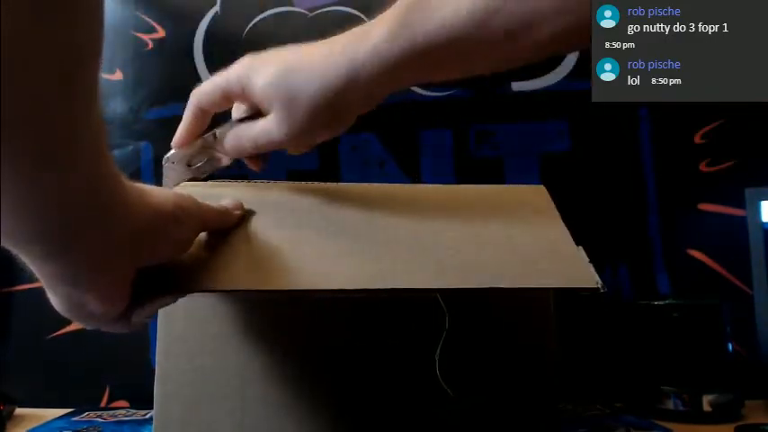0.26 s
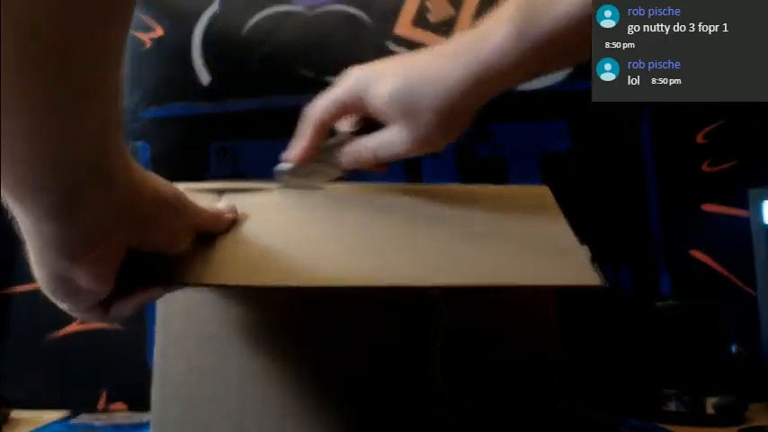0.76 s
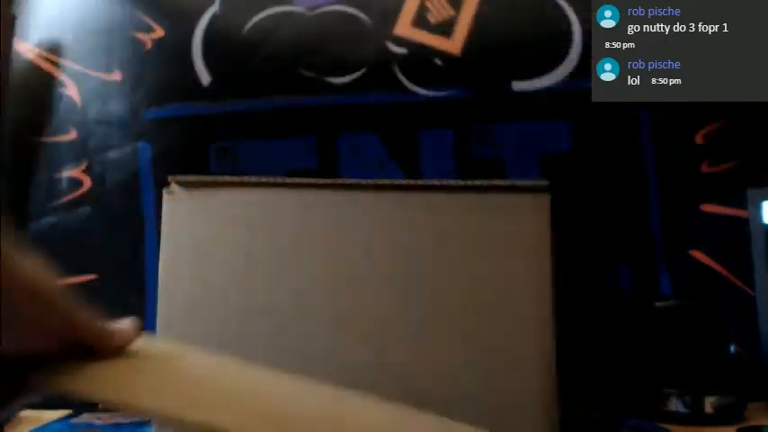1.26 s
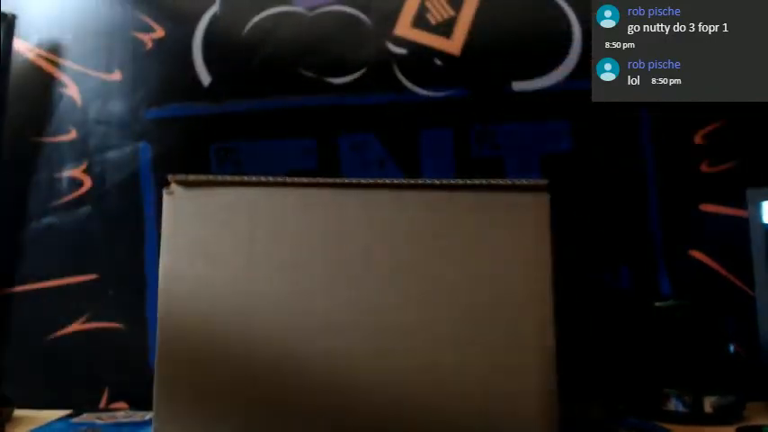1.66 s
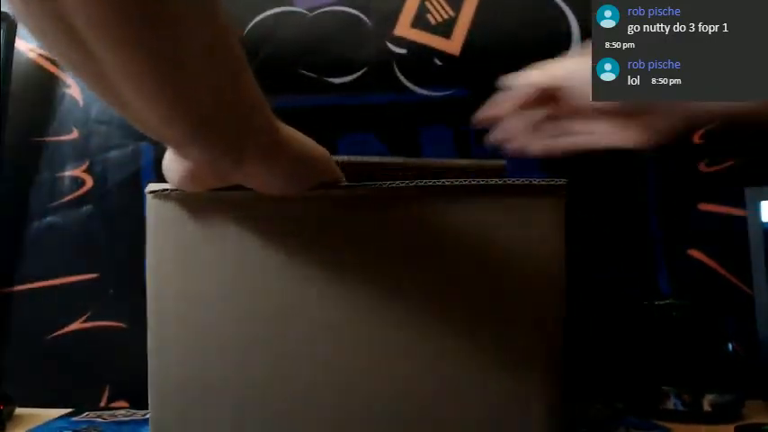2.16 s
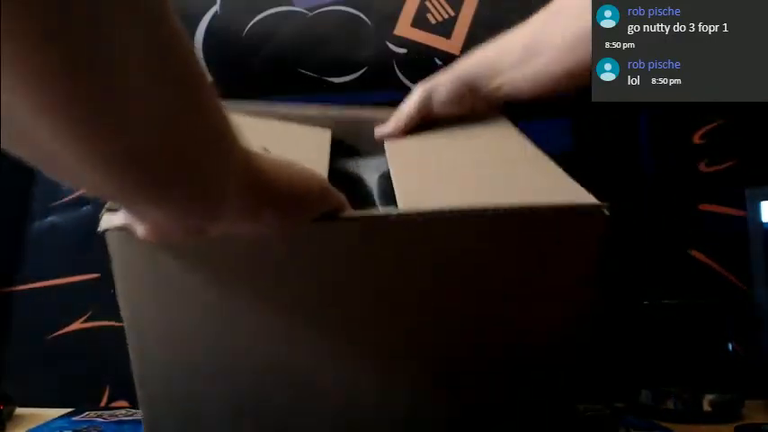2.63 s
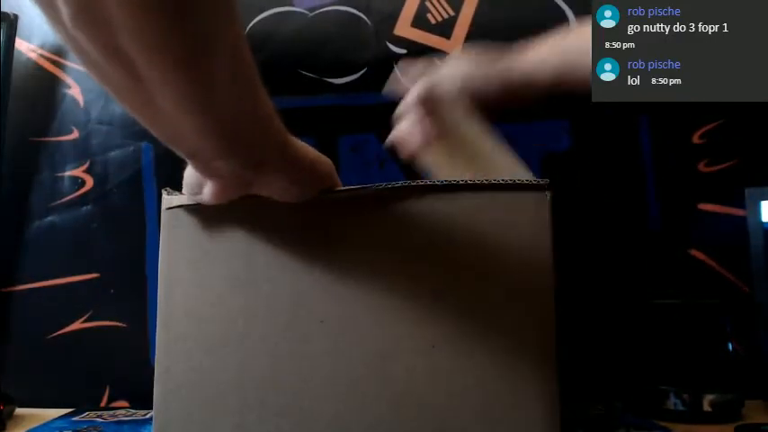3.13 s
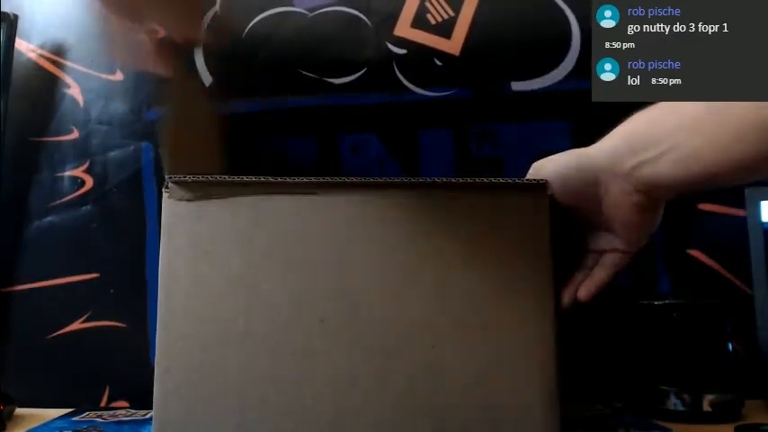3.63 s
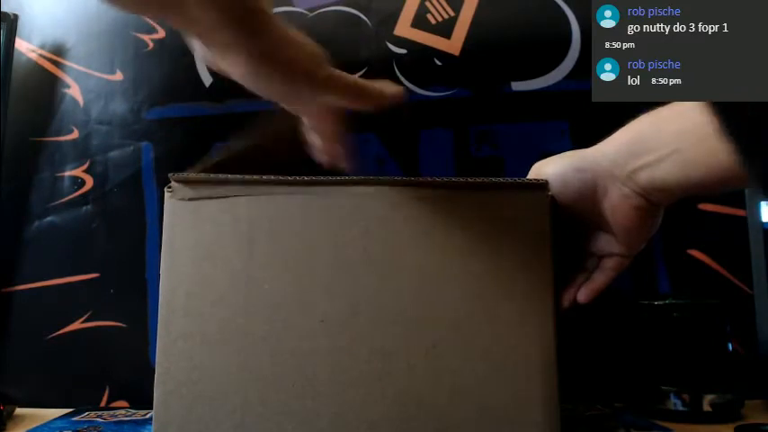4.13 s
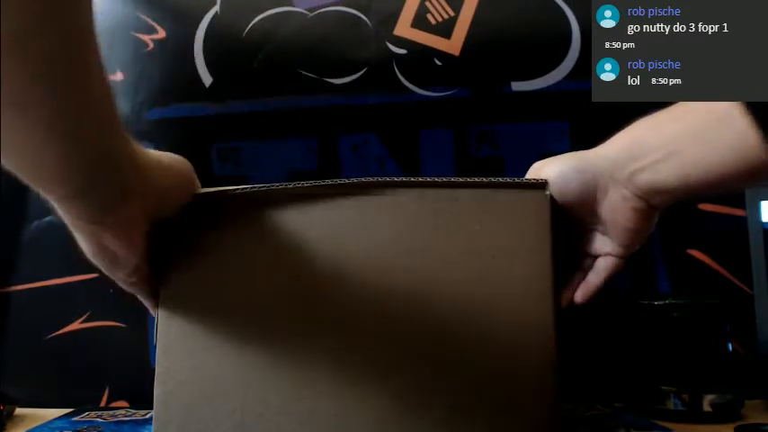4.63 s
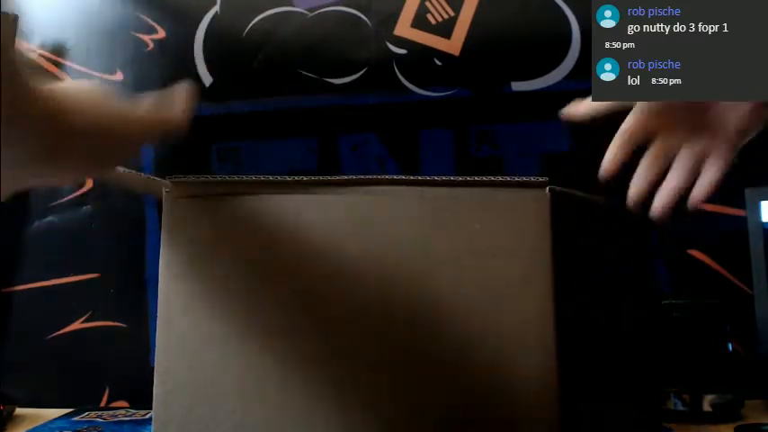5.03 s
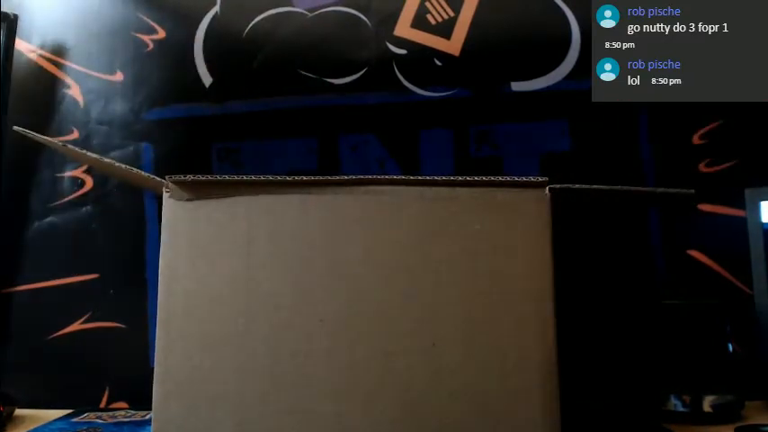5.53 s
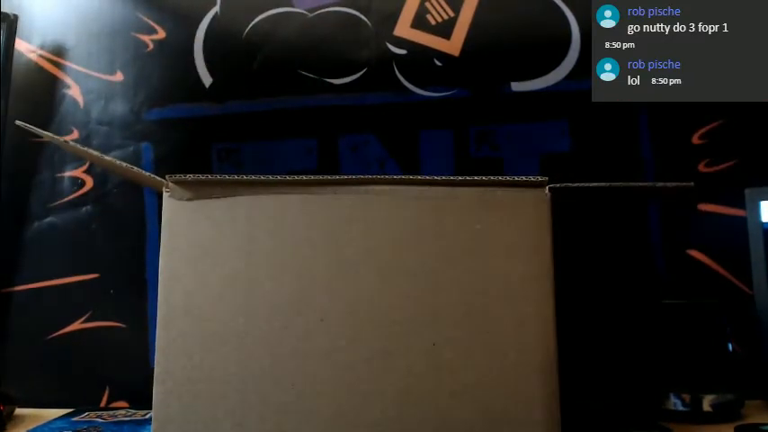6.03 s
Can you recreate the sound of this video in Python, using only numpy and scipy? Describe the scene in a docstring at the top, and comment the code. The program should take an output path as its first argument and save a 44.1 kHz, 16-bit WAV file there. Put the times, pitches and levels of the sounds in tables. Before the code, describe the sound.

Close-up cardboard box opening: ripping blade chatter, a dropped knife's clack, scuffing hands, a loud flap slap and sharp hollow pops, then near quiet.

```python
"""Knife and corrugated box

Close on the desk in a small furnished room with a quiet hum: hands rub and knock a corrugated box.
A knife slides along its edge, chattering over the flutes, and is dropped on the desk; hands then slide
on the board, slap it and flick the flaps open, and a loose piece is dragged further from the microphone.
Rubbing is tearing-fibre noise in five registers; blows, knife and slap are clicks into ringing modes and
noise bursts; chatter, squeak and whistles are wavering sines."""
import sys
import numpy as np
from scipy import signal
from scipy.fft import rfft, irfft
from scipy.io import wavfile

SR = 44100
rng = np.random.default_rng(int(sys.argv[2]) if len(sys.argv) > 2 else 0)


def gain_from_db(level_db):
    """Convert decibel levels to linear amplitude factors (20 dB per decade)."""
    decades = np.asarray(level_db, float) / 20
    return 10 ** decades


def unload_wav(signal):
    """Save mono or channel-first audio to the path in sys.argv[1] as 16-bit WAV at rate SR, clipped to [-1, 1]."""
    wavfile.write(
        sys.argv[1],
        SR,
        np.round(np.clip(np.atleast_2d(signal).T, -1, 1) * 32767).astype(np.int16),
    )


N = 276948


def rms_one(x):
    """Scale to an rms of 1."""
    return x / np.sqrt(np.mean(x ** 2) + 1e-20)


def in_time(rows):
    """Columns after the first (time in seconds) as sample-rate curves."""
    s, *columns = np.transpose(rows)
    return [np.interp(np.arange(N) / SR, s, c) for c in columns]


def during(rows, fade_s):
    """1 while a table lasts, fading just outside both ends."""
    t = np.arange(N) / SR
    return np.clip(np.minimum(t - rows[0][0], rows[-1][0] - t) / fade_s + 1, 0, 1)


def band(x, low_hz, high_hz):
    """Second-order band-pass."""
    top_hz = min(high_hz, .45 * SR)
    return signal.sosfilt(signal.butter(2, [low_hz, top_hz], "band", fs=SR, output="sos"), x + 1e-18)


def coloured(x, spectrum):
    """Shape a steady sound by gains in dB at given Hz, joined along log frequency."""
    hz, db = np.transpose(spectrum)
    grid = np.maximum(np.arange(N // 2 + 1) * SR / N, 1)
    return irfft(rfft(x) * gain_from_db(np.interp(np.log(grid), np.log(hz), db)), N)


def drift(rate_hz):
    """Slow random curve of spread 1: noise through a double low-pass."""
    r = np.exp(-2 * np.pi * rate_hz / SR)
    noise = rng.standard_normal(N + SR)
    return rms_one(signal.lfilter([1], [1, -2 * r, r * r], noise)[SR:])


def strikes(times, levels_db):
    """Single-sample clicks."""
    clicks = np.zeros(N)
    clicks[(np.asarray(times) * SR).astype(int)] = gain_from_db(levels_db)
    return clicks


def ring(clicks, hz, t60):
    """A unit click sets a sine of height 1 ringing; t60 in seconds."""
    r, w = gain_from_db(-60 / (t60 * SR)), 2 * np.pi * hz / SR
    return signal.lfilter([0, np.sin(w)], [1, -2 * r * np.cos(w), r * r], clicks + 1e-18)


def puff(clicks, low_hz, high_hz, t60):
    """Noise that swells within a millisecond or two of each click and dies."""
    swell = np.exp(-1 / (.0007 * SR))
    poles = np.convolve([1, -swell], [1, -gain_from_db(-60 / (t60 * SR))])
    dying = signal.lfilter([1 - swell], poles, clicks + 1e-18)
    noise = rms_one(band(rng.standard_normal(N), low_hz, high_hz))
    return band(dying * noise, low_hz, high_hz)


# Room air. Each row: frequency in Hz, relative level in dB.
AIR = [(25, 9), (60, -12.5), (150, -9), (400, -25), (600, -24), (2500, -32.5), (6000, -42.5), (16000, -55)]
# Hum partials. Each row: frequency in Hz, peak level in dB before a slow waver.
HUM = [(118.4, -62.5), (242.2, -71), (360.7, -70)]


def background():
    """Steady air is shaped noise; the hum is sines that waver in level and phase."""
    air = gain_from_db(-51) * rms_one(coloured(rng.standard_normal(N), AIR))
    t = np.arange(N) / SR
    hum = sum(gain_from_db(db + 2.0 * drift(5.3)) * np.sin(2 * np.pi * hz * t + 0.29 * drift(6.6))
              for hz, db in HUM)
    return air + hum


# Hands and flaps rubbing the board. Each row: start in seconds, length in seconds, panel shake in dB,
# rasp in dB, hiss in dB, fine fibre in dB.
RUBS = [(0, 0.12, -77, -72, -72.5, -100), (0.126, 0.0109, -52.5, -50, -47, -46),
        (0.184, 0.16, -65, -70, -67.5, -77.5), (0.285, 0.086, -55, -58, -59, -65),
        (0.362, 0.031, -40, -44, -42, -62), (1.124, 0.15, -63, -54, -61.5, -88),
        (1.286, 0.023, -72, -56, -47.5, -50.5), (1.32, 0.092, -67.5, -54, -45.5, -52),
        (1.428, 0.11, -88, -63.5, -57, -58), (1.547, 0.035, -62, -54.5, -42.5, -54.5),
        (1.628, 0.021, -52, -48, -49, -52), (1.656, 0.05, -38.5, -40, -55, -57),
        (1.739, 0.13, -40.5, -39.5, -44.5, -53.5), (1.867, 0.078, -50.5, -51.5, -56, -55),
        (1.953, 0.03, -54, -67, -70.5, -60), (2.093, 0.13, -40.5, -47, -49, -47.5),
        (2.213, 0.04, -50, -40.5, -42.5, -46), (2.26, 0.04, -54, -52, -74, -83),
        (2.327, 0.074, -55, -55, -53.5, -50.5), (2.408, 0.024, -47, -48, -43.5, -42),
        (2.481, 0.23, -46.5, -48.5, -49, -52.5), (2.577, 0.043, -55, -42, -44, -39.5),
        (2.619, 0.14, -44, -39.5, -40.5, -43.5), (2.753, 0.086, -49.5, -46, -43.5, -47.5),
        (2.845, 0.018, -50, -51.5, -49, -58.5), (2.89, 0.037, -38.5, -43.5, -50.5, -50),
        (2.969, 0.033, -51, -54, -60, -54.5), (3.019, 0.061, -57, -51, -55, -39),
        (3.072, 0.082, -48, -45, -49.5, -50.5), (3.186, 0.063, -55, -57, -55.5, -59),
        (3.242, 0.12, -49, -50.5, -49, -47.5), (3.352, 0.021, -42.5, -42.5, -37.5, -42),
        (3.405, 0.064, -43.5, -39, -46, -49.5), (3.466, 0.043, -49.5, -45, -50, -51.5),
        (3.549, 0.078, -63.5, -68, -71.5, -74), (3.686, 0.24, -86, -95.5, -94, -88.5),
        (3.952, 0.026, -46.5, -60, -63.5, -57.5), (3.978, 0.043, -26.5, -41, -62.5, -35.5),
        (4.066, 0.028, -53, -53, -56.5, -57), (4.124, 0.16, -68, -61.5, -66, -66),
        (4.171, .09, -51.5, -55, -55, -52.5), (4.266, 0.038, -52.5, -51, -47.5, -48.5),
        (4.301, 0.025, -29, -36, -39, -41), (4.357, 0.041, -45, -47, -46, -59.5),
        (4.398, 0.096, -57, -60.5, -58, -77.5), (4.541, 0.12, -58, -66.5, -65, -70.5),
        (4.615, 0.1, -54.5, -55.5, -52.5, -58), (4.715, 0.035, -59, -49, -65, -50),
        (4.852, 0.027, -71, -71, -56.5, -67), (4.916, 0.032, -63, -62, -54.5, -58),
        (4.978, 0.14, -64.5, -63, -67.5, -74), (5.132, 0.284, -68, -68, -74, -78.5),
        (5.359, 0.034, -64, -64.5, -56.5, -76.5), (5.422, 0.059, -71.5, -62, -54, -60.5),
        (5.507, 0.068, -60.5, -67, -64.5, -75), (5.57, 0.83, -62, -70, -67.5, -74)]
RUB_ATTACK_S = 0.01  # the cut shares it


def rub_power():
    """Power of the five registers for every rub: attack, sagging hold, then a fade as the hand lifts."""
    t, power = np.arange(N) / SR, np.zeros((5, N))
    hold_share, sag_db_per_s, lift_db_per_s = 0.86, 15, 300
    for start, length, shake, rasp, hiss, fibre in RUBS:
        first = int(start * SR)
        age = t[:min(int((length + .3) * SR), N - first)]
        after = np.maximum(age - hold_share * length, 0)
        shape = np.minimum(age / RUB_ATTACK_S, 1) * gain_from_db(-sag_db_per_s * age) * gain_from_db(-lift_db_per_s * after)
        levels_db = np.array([shake, shake, rasp, hiss, fibre])  # the desk shakes with the panel
        power[:, first:first + len(age)] += (gain_from_db(levels_db)[:, None] * shape) ** 2
    return power


# The blade pulled along the edge. Each row: time in seconds, rasp in dB, panel shake in dB.
CUT = [(.385, -36.5, -42.5), (.5, -37.5, -47), (.6, -34, -40.5), (.7, -33, -35.5), (.8, -31.5, -30),
       (.87, -32.5, -32), (.935, -31, -31), (1.0, -32.5, -27.5), (1.03, -27.5, -39.5), (1.06, -28.5, -35.5)]


def cut_power():
    """Power of the five registers as the blade is pulled; desk, hiss and fibre follow the rasp."""
    t = np.arange(N) / SR
    rasp_db, shake_db = in_time(CUT)
    attack = np.clip((t - CUT[0][0]) / RUB_ATTACK_S + 1, 0, 1)
    release = gain_from_db(-277.5 * np.maximum(t - CUT[-1][0], 0))  # dB per s
    levels_db = np.array([rasp_db - 5, shake_db, rasp_db, rasp_db - 1, rasp_db - 3])
    return (attack * release * gain_from_db(levels_db)) ** 2


def fibres(clumps):
    """Fibres tear by the thousand, faster in clumps; now and then a thick one cracks."""
    torn = rng.random(N) < 9000 * clumps / SR
    sizes = gain_from_db(2.4 * np.minimum(rng.exponential(1, N), 5)) * rng.choice([-1, 1], N)
    thick = (rng.random(N) < 150 * clumps / SR) * rng.normal(0, 3.3, N)
    return rms_one(torn * sizes) + 0.54 * rng.standard_normal(N) + thick


# Colour of board under friction. Each row: frequency in Hz, relative level in dB.
FRICTION = [(30, -9.5), (130, -2.5), (400, -2.5), (850, -8.5), (1380, -4.5), (1750, -7), (2900, -9),
            (4500, -9), (8000, -13.5), (10200, -13), (13000, -16), (15800, -11), (16800, -31)]
# The ways the box sounds: desk, panel, rasp, hiss, fine fibre. Each row: low edge in Hz, high edge in Hz,
# t60 of a blow in seconds, t60 of its echo in the room in seconds, echo in dB relative to the blow.
REGISTERS = [(30.7, 167, 0.25, 0.11, -5), (160, 618, 0.13, 0.05, -12), (677, 2790, 0.016, 0.18, -18.5),
             (2630, 9060, 0.012, 0.18, -23.5), (6800, 15000, 0.011, 0.072, -36)]
# Modes of the box. Each row: frequency in Hz, relative level in dB, free t60 in seconds.
BOX = [(265, 0, .09), (360, -7, .15), (433, -15, .15), (553, -7, .17), (855, -8, .15), (1007, -25, .15),
       (1330, -20, .14), (1733, -22, .083), (1997, -23, .11), (2697, -30, .15)]
# Treble patches that come and go under rubbing. Each row: centre in Hz, width in Hz, mean level in dB.
GRAIN = [(3082, 1300, -21), (6630, 1400, -14.5), (7760, 1600, -9), (9140, 1300, -15), (12440, 3700, -13)]


def sliding():
    """Each register has its own fibres; cracks, clumps and pressure are shared; panels resonate along."""
    clumps, pressure_db = gain_from_db(2.3 * drift(130)), 0.8 * drift(30)
    # thick fibres crack through every register at once
    cracking = rng.random(N) < 150 * clumps * gain_from_db(6.0 * drift(12)) / SR
    cracks = cracking * rng.normal(0, gain_from_db(12), N)
    sources = [rms_one(band(coloured(fibres(clumps) + cracks, FRICTION), low, high))
               for low, high, *_ in REGISTERS]

    rasp = sources[1] + sources[2]
    for hz, db, t60 in BOX:  # now one panel mode, now another
        mode = gain_from_db(.6 * db + 6 * drift(19.0)) * rms_one(ring(rasp, hz, .5 * t60))
        if hz < 800:
            sources[1] += 0.18 * mode
        else:
            sources[2] += .3 * mode

    for hz, width, db in GRAIN:
        k = 3 if hz < 7000 else 4
        patch = rms_one(band(sources[k], hz - width / 2, hz + width / 2))
        sources[k] = sources[k] + gain_from_db(db + 3.2 * drift(14.0)) * patch

    out = 0
    for power, source in zip(rub_power() + cut_power(), sources):
        waver = gain_from_db(pressure_db + 0.89 * drift(28))
        out = out + np.sqrt(power) * waver * rms_one(source)
    return out


# Faint thin whistles that glide. Each row: start in seconds, length in seconds, first pitch in Hz,
# last pitch in Hz, mean level in dB rms.
WHISTLE = [(.03, .1, 5300, 6250, -76), (.2, .09, 5400, 5920, -77), (1.195, .07, 2400, 2500, -66),
           (1.328, .025, 6400, 6500, -54), (1.358, .012, 6400, 5900, -54), (1.33, .045, 3200, 3080, -59)]


def whistle():
    """Near sines that glide and waver a little in pitch and level."""
    out = 0
    for start, length, first_hz, last_hz, db in WHISTLE:
        rows = [(start, first_hz), (start + length, last_hz)]
        hz = in_time(rows)[0] * (1 + .008 * drift(150))
        level = np.sqrt(2) * gain_from_db(db + 3.0 * drift(30)) * during(rows, .01)
        out = out + level * np.sin(2 * np.pi * np.cumsum(hz) / SR)
    return out


def burst(s, levels_db):
    """Per register a short burst of noise, then its uneven echo from the room."""
    out, uneven = 0, gain_from_db(2.0 * drift(60))
    for db, (low, high, t60, echo_t60, echo_db) in zip(levels_db, REGISTERS):
        out = out + puff(strikes(s, db), low, high, t60)
        out = out + uneven * puff(strikes(s + 0.0053, db + echo_db), low, high, echo_t60)
    return out


def struck(s, levels_db, pitches_hz, t60):
    """Each blow leaves a dying sine at its own pitch."""
    out, t = np.zeros(N), np.arange(SR // 5) / SR
    for start, db, hz in zip((s * SR).astype(int), levels_db, pitches_hz):
        tone = gain_from_db(db - 60 * t / t60) * np.sin(2 * np.pi * hz * t)
        out[start:start + len(t)] += tone[:N - start]
    return out


# Blows and snaps on the box. Each row: time in seconds, then relative levels of snap in dB, panel in dB
# and crack in dB, struck panel pitch in Hz, snap pitch in Hz.
BLOWS = [(.133, -40, -57, -32.5, 233, 1770), (0.295, -36.5, -44.5, -49.5, 400, 1960),
         (.334, -43, -52, -49.5, 387, 970), (0.376, -16.5, -36, -29.5, 203, 1060),
         (.38, -14, -31.5, -30.5, 408, 1650), (0.4, -42, -49, -32, 337, 1120),
         (0.778, -12, -24.5, -20, 692, 874), (0.941, -23, -25.5, -34, 316, 1360),
         (1.0173, -4.5, -14.5, -22, 435, 1250), (1.04, -16.5, -35.5, -24.5, 640, 1300),
         (1.107, -27.5, -36.5, -48.5, 635, 830), (1.295, -44, -54, -37.5, 200, 1370),
         (1.371, -37, -65, -35.5, 298, 3850), (1.391, -41, -72, -38, 300, 3000),
         (1.43, -45, -58, -61.5, 700, 1300), (1.563, -29, -46.5, -50.5, 212, 1790),
         (1.57, -31, -77, -51, 204, 2460), (1.58, -25, -78, -46.5, 204, 2980),
         (1.59, -41, -72, -47, 204, 2960), (1.876, -28, -32.5, -42.5, 350, 1250),
         (2.095, -31, -42.5, -48.5, 470, 1390), (2.136, -56, -28, -40, 240, 893),
         (2.161, -28, -33, -32.5, 312, 1060), (2.194, -23, -30.5, -44, 286, 1050),
         (2.209, -45, -35, -49.5, 257, 1000), (2.231, -33, -56, -44.5, 300, 1800),
         (2.247, -32, -57, -46.5, 300, 2600), (2.308, -39.5, -60, -50, 300, 1470),
         (2.323, -41, -40, -58, 287, 1020), (2.417, -36, -67.5, -33.5, 396, 2430),
         (2.436, -16.5, -30, -26.5, 396, 1710), (2.467, -8, -13, -23, 392, 1005),
         (2.49, -39.5, -31, -54.5, 425, 900), (2.512, -45, -33.5, -54.5, 420, 900),
         (2.588, -31, -34, -36, 230, 870), (2.604, -29, -40, -45.5, 260, 1480),
         (2.635, -13.5, -34.5, -21.5, 301, 1570), (2.709, -37, -53, -39.5, 398, 1800),
         (2.721, -25, -39, -43, 247, 1000), (2.79, -46, -43, -31.5, 240, 3060),
         (2.803, -36, -48, -35.5, 300, 2460), (2.856, -37, -44, -56.5, 300, 1390),
         (2.898, -19.5, -38, -26, 380, 1590), (3.083, -27.5, -34, -45.5, 200, 1050),
         (3.098, -35, -64, -56.5, 300, 1300), (3.13, -32, -47.5, -55, 305, 2020),
         (3.27, -38, -29.5, -36, 195, 1210), (3.328, -25.5, -34.5, -49, 335, 2620),
         (3.282, -43, -39.5, -56.5, 587, 900), (3.339, -45, -39, -50, 358, 1200),
         (3.376, -21, -17.5, -14.5, 283, 2980), (3.379, -1.5, -21, -10.5, 286, 1356),
         (3.382, -11, -34.5, -37.5, 507, 2000), (3.432, -40, -33, -56.5, 280, 1500),
         (3.505, -42, -39.5, -62.5, 426, 866), (3.527, -34, -39, -38, 230, 1480),
         (3.952, -36.5, -47.5, -50.5, 305, 1247), (3.975, -44, -46.5, -47.5, 379, 1250),
         (3.985, -11, -19.5, -44, 405, 1465), (4.013, -23, -37, -37.5, 295, 1300),
         (4.092, -49, -45, -48.5, 305, 2280), (4.182, -57, -33.5, -54.5, 198, 930),
         (4.302, -21.5, -34.5, -27.5, 443, 1710), (4.326, -4, -19, -8.5, 236, 1590),
         (4.33, -42, -26.5, -44, 605, 2170), (4.526, -48, -48.5, -57.5, 304, 890),
         (4.609, -37.5, -48.5, -64, 294, 790), (4.673, -39.5, -57, -38, 526, 2560),
         (4.742, -37, -45, -42.5, 354, 1900), (4.845, -35.5, -50.5, -34.5, 440, 2100),
         (5.009, -39.5, -68, -65.5, 325, 1193), (5.158, -45.5, -57, -76, 205, 955),
         (5.381, -39.5, -70, -52, 338, 3120), (5.385, -41.5, -75.5, -60.5, 334, 2880),
         (5.507, -42.5, -74, -57.5, 327.7, 3060), (5.874, -46.5, -50.5, -76, 201.4, 1216),
         (6.052, -32, -48.5, -72, 637, 1117), (6.117, -30, -76.5, -70.5, 303, 2480),
         (6.132, -28.5, -59, -64, 296, 1480), (6.171, -25.5, -46, -60, 312, 2310)]


def blows():
    """Each blow: a thud into the desk, the struck spot and the whole box ringing, a snap and a crack."""
    s, snap_db, panel_db, crack_db, panel_hz, snap_hz = np.transpose(BLOWS)
    thud_db = panel_db - 11.5
    hollow_db = -12.5 - 13 * np.log2(snap_hz / 1000)  # sharper snaps ring the hollow box less
    out = ring(strikes(s + 0.0036, thud_db - 2.0), 47, 0.12)
    out += ring(strikes(s + 0.0024, thud_db - 0.5), 170, 0.07)

    luck = rng.normal(0, 2, (len(s), len(BOX)))  # dB, each blow excites the modes differently
    for (hz, db, t60), extra_db in zip(BOX, luck.T):
        level_db = panel_db - 11.0 if hz < 500 else snap_db + hollow_db
        out += ring(strikes(s + .0015, level_db + db + extra_db), hz, 0.87 * t60)
    out += struck(s + 0.0014, panel_db + 9.0, panel_hz, 0.04)
    out += struck(s + .001, snap_db - 4.5, snap_hz, 0.02)

    # the sharp edge of the contact, then the bright crack
    out += band(band(strikes(s + 0.0013, snap_db + 9), 800, 3600), 800, 3600)
    edge = strikes(s + .0012, crack_db + 22.5)
    out += band(band(edge, 2200, 7500), 2200, 7500) + .15 * band(edge, 7500, 16000)
    return out + burst(s, [thud_db - 4.0, panel_db - 4.5, snap_db - 7.0, crack_db + 4, crack_db - 3])


# Soft bumps of hands and box that shake the desk. Each row: time of fullest swell in seconds,
# level in dB, pitch in Hz.
BUMPS = [(0.147, -56, 70), (1.292, -50, 90.5), (1.659, -43, 144), (1.745, -32.5, 145), (1.841, -39, 68.5),
         (1.887, -52, 79), (2.142, -42, 144), (2.17, -34.5, 72), (2.334, -42, 91), (2.476, -36, 70.4),
         (2.751, -28, 130.4), (2.919, -35, 57), (3.082, -41, 81.4), (3.271, -42, 88), (3.535, -33.5, 68.9),
         (3.58, -43, 89.8), (4.005, -27, 83), (4.095, -35, 79), (4.189, -49, 80), (4.334, -24, 64),
         (5.19, -46.5, 112), (5.268, -55, 327), (5.521, -59.5, 132), (5.572, -52, 184), (5.2, -52, 210),
         (5.24, -57, 330), (5.384, -54, 80.4), (5.51, -54.5, 320), (5.631, -63.5, 323), (5.795, -54, 186),
         (5.82, -49, 121), (6.052, -50.5, 180), (6.135, -45.5, 299), (6.168, -47, 175), (6.2, -46, 239),
         (6.231, -48, 210)]


def bumps():
    """The desk rocks for a few low cycles under a soft push: quick to swell, slower to settle."""
    out, t = np.zeros(N + SR), np.arange(SR // 4) / SR
    swell_s = 0.011
    envelope = t / swell_s * np.exp(1 - t / swell_s)
    for s, db, hz in BUMPS:
        first = int((s - swell_s) * SR)
        out[first:first + len(t)] += np.sqrt(2) * gain_from_db(db) * envelope * np.sin(2 * np.pi * hz * t)
    return out[:N]


# Bright ticks as fibres and tape let go. Each row: time in seconds, strike level in dB, centre in Hz.
TICKS = [(0.3825, -19, 8200), (0.3976, -21, 9400), (0.418, -26, 7500), (0.472, -30, 7940),
         (1.004, -23, 9040), (1.254, -60, 7000), (1.742, -22, 8350), (1.879, -37, 8200),
         (1.9011, -38.5, 7060), (2.2153, -34.5, 7700), (2.7207, -41, 7260), (2.8044, -29, 6810),
         (3.028, -35.5, 8350), (3.8764, -65.5, 8200), (3.984, -15.5, 7400), (4.0067, -23.5, 7250),
         (4.0924, -53, 7850), (4.846, -26.5, 6650), (5.288, -57.5, 7030), (5.5195, -43, 8700)]


def ticks():
    """A very short puff of noise around the pitch of each tick."""
    width, t60 = 1.2, .015  # ratio of band edge to centre; seconds
    return sum(puff(strikes([s], db), hz / width, hz * width, t60) for s, db, hz in TICKS)


# The blade crossing the flutes. Each row: time in seconds, mean flutes per second, chatter in dB,
# its octave in dB.
FLUTES = [(.39, 142, -25, -48), (.442, 97, -35, -44), (.502, 82, -34, -42), (.546, 123, -43, -67),
          (.59, 118, -25, -68), (.684, 156, -33.5, -46), (.76, 91, -50, -64), (.852, 140, -26.5, -56),
          (.895, 152, -40, -35), (.93, 157, -45, -27), (.965, 146, -50, -33.5), (1.0, 156, -59.5, -30.5)]


def flutes():
    """Phase of the blade over the uneven flutes, one turn per flute."""
    return 2 * np.pi * np.cumsum(in_time(FLUTES)[0] * (1 + 0.023 * drift(24))) / SR


def chatter(phase):
    """One uneven push per flute, rounded by the soft board; the panel picks out its octave."""
    _, level_db, octave_db = in_time(FLUTES)
    push = gain_from_db(level_db) * np.sin(phase) + gain_from_db(octave_db) * np.sin(2 * phase)
    return np.sqrt(2) * gain_from_db(2.0 * drift(33)) * during(FLUTES, 0.018) * push


# The knife meets the desk and bounces. Each row: time in seconds, relative clack level in dB,
# relative ring level in dB, ring pitch in Hz.
KNIFE_DROPS = [(1.638, -14, -45.5, 5450), (1.657, -3, -29, 6060), (1.671, -12.5, -40, 6000),
               (1.682, -22, -52, 6140), (1.737, -9.5, -25, 6380), (1.743, -0.5, -20, 6130),
               (1.748, -18.5, -35.5, 6260), (1.755, -13.5, -36.5, 6350), (1.808, -18, -43, 6350)]
# Modes of the knife. Each row: frequency in Hz, relative level in dB, t60 in seconds.
KNIFE = [(210, -12.5, 0.067), (435, -17.5, 0.25), (780, -13, 0.16), (1428, -7, 0.073), (1628, 5.5, 0.02),
         (1800, -3.5, .04), (2430, 2, 0.017), (2650, -19, 0.051), (4360, -15.5, 0.022)]


def knife():
    """A short clack of the handle, and a blurred glint of the loose blade."""
    s, peak_db, ring_db, _ = np.transpose(KNIFE_DROPS)
    out = burst(s, [peak_db - 41.0, peak_db - 28.5, peak_db - 10.5, ring_db + 8.5, ring_db - 0.5])
    for at, _, db, hz in KNIFE_DROPS:
        out += puff(strikes([at], db - 4.0), .95 * hz, 1.05 * hz, 0.16)
    luck = rng.normal(0, 3, (len(s), len(KNIFE)))  # dB, each bounce excites the modes differently
    for (hz, db, t60), extra_db in zip(KNIFE, luck.T):
        out += ring(strikes(s, peak_db - 12.0 + db + extra_db), hz, t60)
    return out


# A flap slapped flat. Each row: time in seconds, level over the box modes in dB.
SLAPS = [(3.381, -7)]


def slaps():
    """The slap sets the whole empty box ringing: every mode rings out in full."""
    s, level_db = np.transpose(SLAPS)
    return sum(ring(strikes(s, level_db + db), hz, t60) for hz, db, t60 in BOX)


# A faint squeak as a flap settles. Each row: time in seconds, level in dB.
SQUEAK = [(4.915, -75), (4.95, -65), (4.98, -74), (5.02, -63), (5.05, -72), (5.1, -69), (5.13, -78)]
# Its partials. Each row: multiple of the base pitch, mean relative level in dB.
SQUEAK_PARTIALS = [(2, 0), (3, -6), (4, -1), (5, -6)]


def squeak():
    """A wavering creak on a 590 Hz base whose partials come and go."""
    phase = 2 * np.pi * np.cumsum(590 * (1 + 0.012 * drift(60))) / SR
    tone = sum(gain_from_db(db + 3.5 * drift(20)) * np.sin(k * phase + drift(40)) for k, db in SQUEAK_PARTIALS)
    return np.sqrt(2) * during(SQUEAK, 0.015) * gain_from_db(in_time(SQUEAK)[0]) * tone


# A loose piece of board dragged further away. Each row: time in seconds, level in dB.
DRAG = [(5.98, -68), (6.005, -59), (6.035, -56.5), (6.05, -47), (6.07, -48), (6.138, -41), (6.17, -42),
        (6.21, -45), (6.25, -53.5), (6.28, -62)]
# Its resonances. Each row: highest frequency in Hz, width in Hz, mean relative level in dB.
DRAGGED_BOARD = [(200, 84, -1), (301, 79, 3), (752, 190, 2.5), (953, 97, 6), (1300, 180, 3), (1650, 360, 0),
                 (2390, 105, -4), (2970, 390, -17.5), (3730, 550, -21.5), (6300, 970, -14)]


def drag():
    """A dull judder through shifting resonances of the loose board, now one, now another."""
    judder, t, board = fibres(gain_from_db(3.2 * drift(55.7))), np.arange(N) / SR, 0
    # the resonances peak in pitch at the middle of the drag
    bend = np.maximum(1 - 0.56 * np.abs(t - 6.16), .7)
    for hz, width, db in DRAGGED_BOARD:
        # shift the resonance to 0 Hz, filter, and shift back
        turn, r = np.exp(2j * np.pi * hz * np.cumsum(bend) / SR), np.exp(-np.pi * width / SR)
        mode = np.real(signal.lfilter([1], [1, -2 * r, r * r], judder / turn) * turn)
        board = board + gain_from_db(db + 3.0 * drift(20)) * rms_one(mode)
    board = rms_one(board) + .4 * rms_one(band(band(judder, 300, 3200), 300, 3200))
    return band(board, 80, 6000) * gain_from_db(in_time(DRAG)[0]) * during(DRAG, 0.0127)


def scene():
    """All sources at the microphone; each flute also pumps the rubbing."""
    phase = flutes()
    rubbing = sliding() * (1 + .35 * during(FLUTES, 0.018) * np.cos(phase))
    board = rubbing + blows() + bumps() + ticks() + chatter(phase) + slaps() + squeak() + drag()
    return (background() + whistle() + board + knife())[None]


def roll_off(x):
    """The treble ends steeply here."""
    return signal.sosfilt(signal.butter(12, 17020, fs=SR, output="sos"), x)


# Treble colour of the close microphone. Each row: centre in Hz, width in Hz, gain in dB.
MIC_COLOUR = [(4695, 500, -1.5), (8100, 740, 2.0)]


def record(dry):
    """The microphone drops the deepest bass, colours the treble and rounds the loudest peaks."""
    thin = signal.sosfilt(signal.butter(1, 40, "high", fs=SR, output="sos"), dry)
    for hz, width, db in MIC_COLOUR:
        thin = thin + (gain_from_db(db) - 1) * signal.lfilter(*signal.iirpeak(hz, hz / width, fs=SR), thin)
    return roll_off(1.117 * np.tanh(thin / 1.628))


dry = scene()
out = record(dry)
unload_wav(out)
```